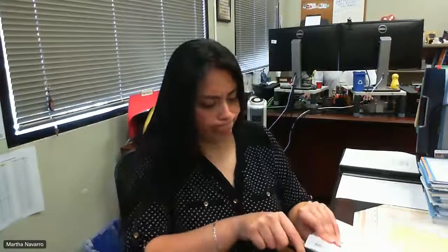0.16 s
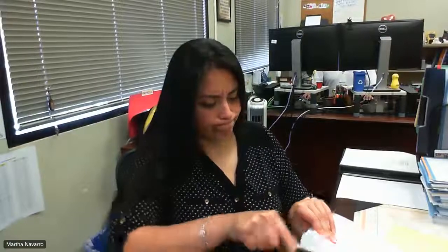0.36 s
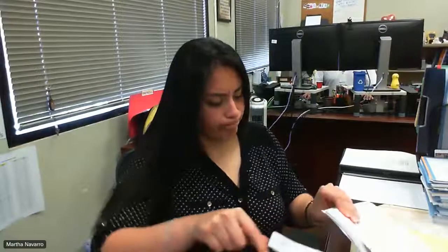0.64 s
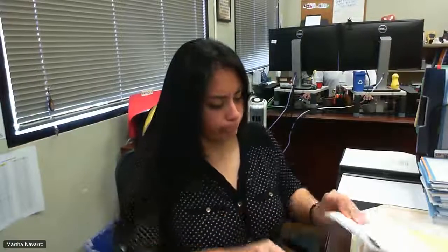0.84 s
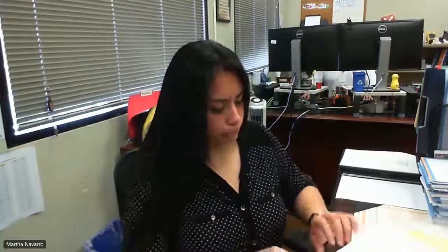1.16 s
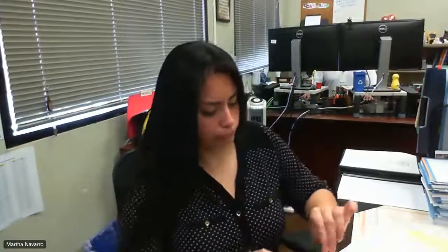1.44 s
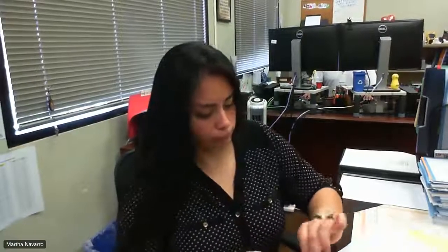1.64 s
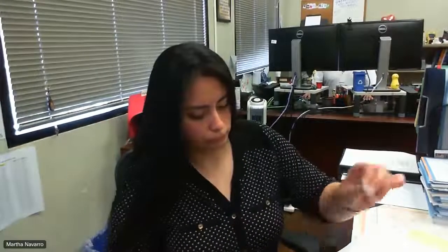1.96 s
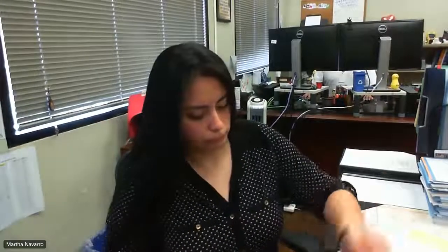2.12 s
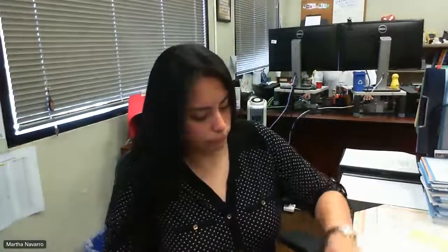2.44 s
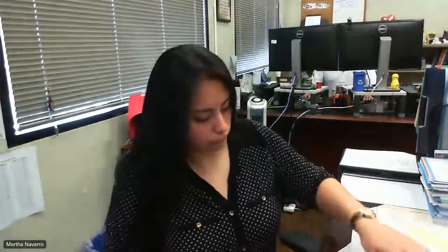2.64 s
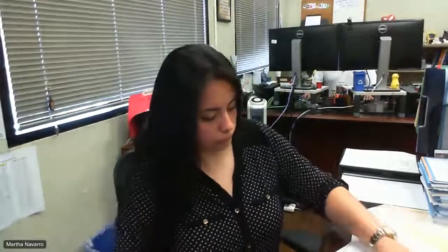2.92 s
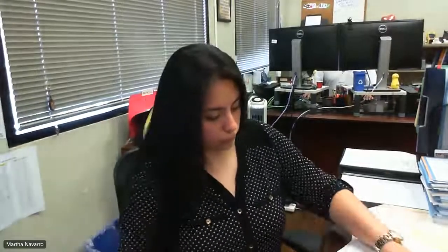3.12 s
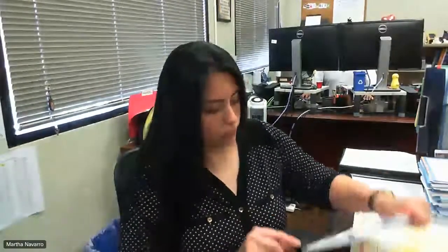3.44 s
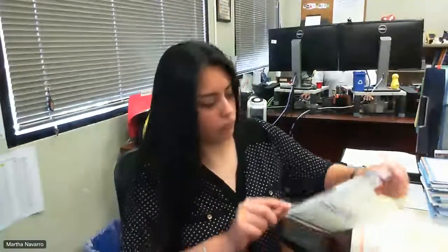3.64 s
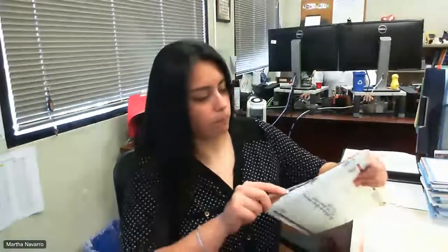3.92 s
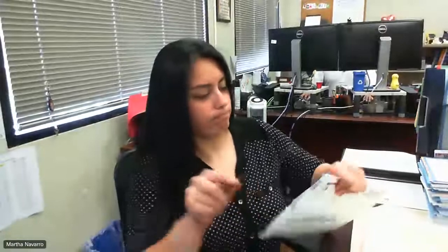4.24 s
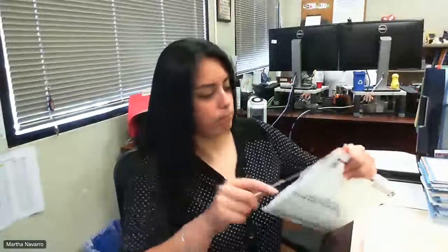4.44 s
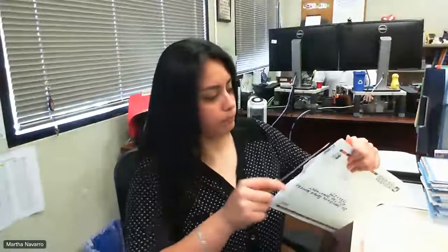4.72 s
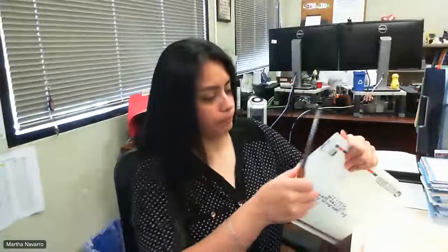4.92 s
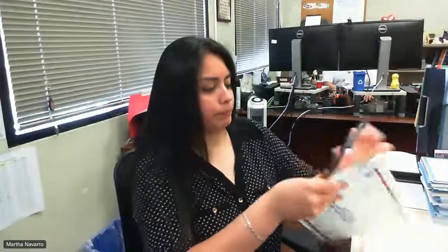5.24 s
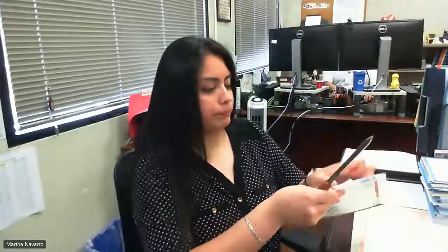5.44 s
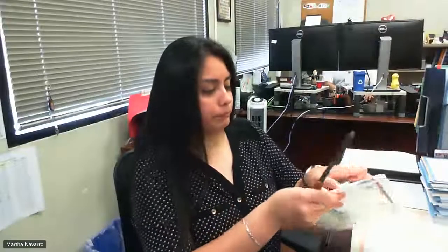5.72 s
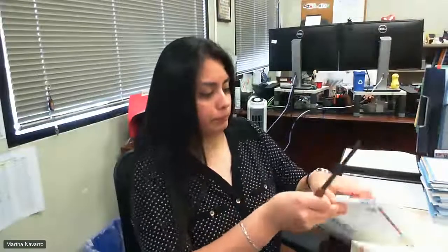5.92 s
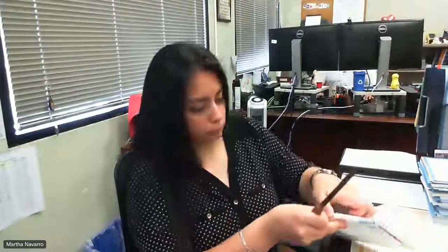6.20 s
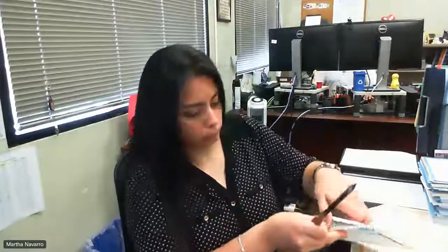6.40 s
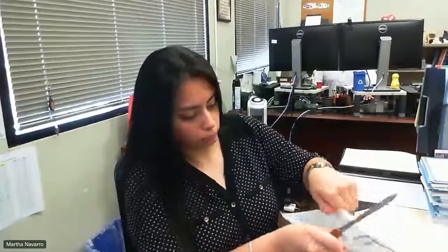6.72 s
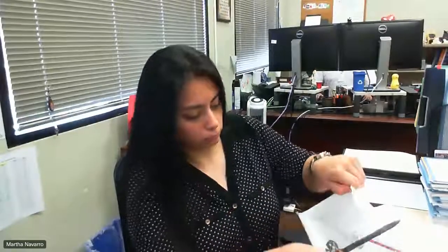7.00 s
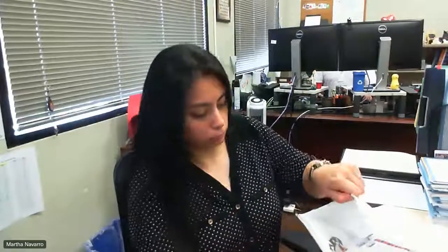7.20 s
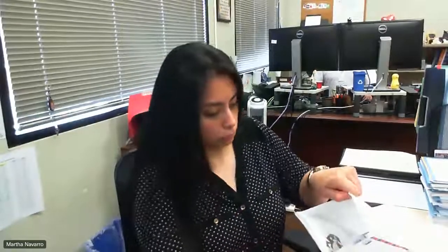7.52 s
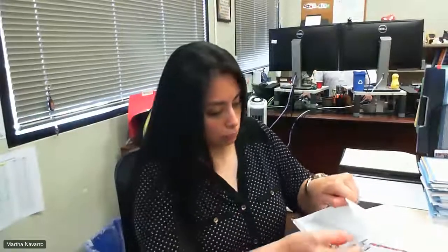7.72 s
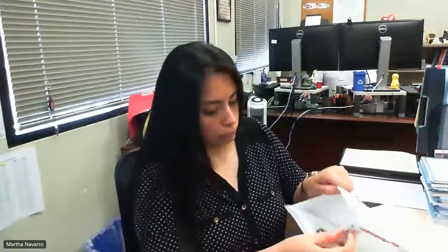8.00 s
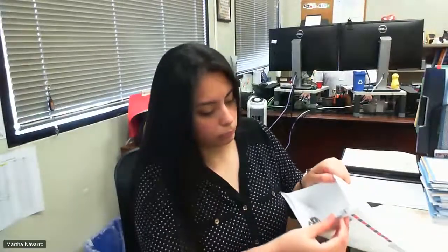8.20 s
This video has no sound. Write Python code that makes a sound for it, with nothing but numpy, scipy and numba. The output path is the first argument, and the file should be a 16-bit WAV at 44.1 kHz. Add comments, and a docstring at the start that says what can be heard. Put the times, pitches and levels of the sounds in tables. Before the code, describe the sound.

Close laptop microphone in a small, dry office. An envelope is slit with loud crackling rips in the first half second, then a firm knock on the desk. Quiet sliding and a short crisp burst follow near two seconds, then a softer thud. Another sharp rip comes past four seconds, then faint rustles, and finally hollow paper crumpling and snapping with small knocks.

```python
"""Paper envelopes are slit, put down, picked up and emptied on an office desk, near a laptop microphone.
Paper: random creases ring as damped sines, snaps click and rattle, a pocket of air resonates, a sheet flaps.
Folds whistle (noise in a narrow resonance), panels ping (sines), sheets slide (band noise).
Desk: knocks ring its low modes, leaning arms make it hum (wavering sines).
A small room answers with a noise tail; the air of the office is coloured noise."""
import sys
import numpy as np
from scipy import signal
from scipy.fft import rfft, irfft, next_fast_len
from scipy.io import wavfile
from scipy.ndimage import uniform_filter1d
from numba import njit

SR = 44100
rng = np.random.default_rng(int(sys.argv[2]) if len(sys.argv) > 2 else 0)


def to_wav(sig):
    """Store sig (one row per channel, or 1-D mono) as 16-bit WAV at the path in sys.argv[1].

    Samples outside -1..1 are clipped; the rate is SR.
    """
    pcm = np.clip(np.atleast_2d(sig), -1, 1) * 32767
    pcm = np.round(pcm).astype(np.int16)
    wavfile.write(sys.argv[1], SR, pcm.T)  # frames by channels


N = 368481


def undb(db):
    """Decibels to amplitude."""
    return 10 ** (np.asarray(db) / 20)


def unit(x):
    """Scale to rms 1."""
    return x / np.sqrt(np.mean(x ** 2))


def curves(table):
    """Columns of a table joined by straight lines over time, -120 outside it."""
    time_s, *columns = np.transpose(table)
    t = np.arange(N) / SR
    return [np.interp(t, time_s, column, left=-120, right=-120) for column in columns]


def colour(x, points):
    """Filter by (frequency [Hz], gain [dB]) points, straight over log frequency."""
    hz, db = np.transpose(points)
    size = next_fast_len(N)
    f = np.arange(size // 2 + 1) * SR / size + 1  # + 1 avoids log 0
    gain = undb(np.interp(np.log(f), np.log(hz), db))
    return irfft(rfft(x, size) * gain, size)[:N]


def band(x, lo_hz, hi_hz):
    """Butterworth band-pass."""
    return signal.sosfilt(signal.butter(2, [lo_hz, hi_hz], "bandpass", fs=SR, output="sos"), x)


def walk(rate_hz):
    """Random normal levels, a new one each 1 / rate_hz, joined by straight slews."""
    k = int(SR / rate_hz)
    levels = np.repeat(rng.standard_normal(N // k + 1), k)
    return uniform_filter1d(levels, k)[:N]


@njit
def rings(n, start, step, fade, size):
    """Damped sines: one for each start sample, angular step, fade per sample and size."""
    y = np.zeros(n)
    for k in range(len(start)):
        turn, z, i = fade[k] * np.exp(1j * step[k]), size[k] + 0j, start[k]
        for j in range(min(n - i, int(7 / (1 - fade[k])))):
            y[i + j] += z.imag
            z *= turn
    return y


@njit
def svf(x, hz, damp):
    """State-variable band-pass whose centre moves; gain 1 at the centre."""
    y, b, l = np.empty(len(x)), 0., 0.
    for i in range(len(x)):
        g = np.tan(np.pi * hz[i] / SR)
        v = (b + g * (x[i] - l)) / (1 + g * (g + damp))
        b, l, y[i] = 2 * v - b, l + 2 * g * v, damp * v
    return y


def lift(x, hz, damp, db):
    """A moving resonance stands out of a broad sound; rms 1."""
    return unit(x + undb(db) * svf(x, np.clip(hz, 300, 12000), damp))


def held(time_s, values):
    """Each value lasts from its moment to the next."""
    index = np.searchsorted(time_s, np.arange(N) / SR) - 1
    return values[np.clip(index, 0, None)]


def held_note(x, start_s, length_s, db, fade_db, edge_s):
    """The start of x, placed at start_s: opens, fades evenly in dB and closes; silence elsewhere."""
    t, out = np.arange(int(length_s * SR)) / SR, np.zeros(N)
    edges = np.clip(np.minimum(t, length_s - t) / edge_s, 0, 1)
    out[int(start_s * SR):][:len(t)] = x[:len(t)] * edges * undb(db - fade_db * t / length_s)
    return out


# spectrum of the office air: (frequency [Hz], relative density [dB])
AIR_SPECTRUM = [(15, -41.5), (25, -9), (205, -22), (364, -8.5), (566, -12.5), (754, -18.5), (881, -17.5),
                (2370, -21), (3070, -30.5), (3980, -31.5), (5440, -33), (6700, -26), (12500, -17)]
AIR_DB = -72


def air():
    """Ventilation and microphone hiss: coloured noise, wavering a little."""
    level_db = AIR_DB + 1.5 * walk(3.9) + 1.0 * walk(7.7)
    return unit(colour(rng.standard_normal(N), AIR_SPECTRUM)) * undb(level_db)


ROOM_T60_S, ROOM_DB, ROOM_GAP_S = 0.055, -9, 0.0023


def room(x):
    """Diffuse tail of a small furnished office: x plus its convolution with decaying noise."""
    t = np.arange(SR // 2) / SR
    tail = rng.standard_normal(len(t)) * undb(-60 * t / ROOM_T60_S) * (t > ROOM_GAP_S)
    tail /= np.sqrt(np.sum(tail ** 2))
    return x + undb(ROOM_DB) * signal.fftconvolve(x, tail)[:N]


# low hums of the desk under leaning arms:
# (start [s], length [s], frequency [Hz], level [dB], fade over the length [dB])
DESK_HUMS = [(2.52, 0.17, 190, -65.5, 4.5), (2.75, 0.046, 187, -68.5, 3), (4.05, 0.3, 105, -73, -6),
             (4.299, 0.61, 104.2, -58, 19.5), (4.46, 0.073, 179, -65, 2), (4.92, 0.47, 105, -77, 0),
             (5.149, .18, 182, -64, 4), (6.58, 0.17, 186, -69, 0.5), (6.95, 0.43, 167.4, -67.5, 8)]


def desk_hums():
    """Sines of the desk, wavering in pitch and level."""
    out = np.zeros(N)
    for start_s, length_s, hz, db, fade_db in DESK_HUMS:
        turns = np.cumsum(hz * (1 + .045 * walk(90)[:SR])) / SR
        hum = np.sqrt(2) * np.sin(2 * np.pi * turns) * undb(3.5 * walk(60)[:SR])
        out += held_note(hum, start_s, length_s, db, fade_db, edge_s=0.01)
    return out


# hands and paper stacks landing on the desk: (time [s], level [dB], pitch that the blow favours [Hz])
KNOCKS = [(0.51, -37.5, 386), (1.145, -15, 860), (2.466, -25.5, 220), (3.262, -51.5, 874),
          (4.288, -31.5, 195.8), (5.422, -53, 469), (5.534, -38.5, 362.5), (6.47, -39, 168),
          (6.9, -23, 470), (7.272, -34, 850), (7.746, -31, 430)]
# modes of the desk top: (frequency [Hz], level [dB], t60 [s])
DESK_MODES = [(102, -12, 0.12), (157, -8, 0.11), (191.6, -12.5, 0.09), (212, -7.5, 0.098),
              (312, -11, 0.047), (403, -6, 0.042), (475, -16, 0.048), (566, -14, 0.042), (624, -12, 0.086),
              (760, -9, 0.047), (860, -10, 0.086), (1250, -14.5, 0.026)]


def knocks():
    """Each knock is a short cluster of soft pushes that rings the modes of the desk top."""
    out = np.zeros(N)
    hz, mode_db, t60_s = np.transpose(DESK_MODES)
    for time_s, blow_db, blow_hz in KNOCKS:
        lag, sign = rng.random((len(hz), 2)).T
        start = ((time_s + 0.011 * lag) * SR).astype(np.int64)
        octaves_off = np.log2(hz / blow_hz)
        size = undb(blow_db + mode_db - 11.0 * octaves_off ** 2) * np.sign(sign - .5)
        out += rings(N, start, 2 * np.pi * hz / SR, 1000 ** (-1 / t60_s / SR), size)
    push = np.hanning(int(0.0011 * SR))  # a hand is soft
    return np.convolve(band(out, 95., 4000.), push / push.sum())[:N]


# sheets sliding over each other:
# (start [s], length [s], frequency [Hz], level [dB], fade over the length [dB])
SLIDES = [(1.504, 0.46, 6300, -69.5, 2.5), (3.483, .11, 6600, -51.5, -7.5), (6.501, 0.43, 6940, -63, -1),
          (7.368, 0.39, 6340, -48, 21)]


def slides():
    """Smooth rubbing: noise in a broad band around the pitch of each slide."""
    out = np.zeros(N)
    for start_s, length_s, hz, db, fade_db in SLIDES:
        hiss = unit(band(rng.standard_normal(SR), hz * 0.8, hz * 1.07))
        out += held_note(hiss, start_s, length_s, db, fade_db, edge_s=0.016)
    return out


# small stiff panels ringing as a fold gives way: (time [s], frequency [Hz], level [dB])
PINGS = [(1.936, 3360, -29), (1.951, 3920, -33), (4.195, 3770, -32), (4.244, 4220, -22),
         (5.531, 1870, -40.5), (6.994, 1810, -30), (7.656, 2487, -21), (7.657, 3750, -32.5)]
PING_T60_S, PING_SWELL = 0.02, 3.3  # the swell is that many times quicker than the decay


def pings():
    """A sine that swells in and dies: a slow decay minus a quicker one."""
    time_s, hz, db = np.transpose(PINGS)
    start, step = (time_s * SR).astype(np.int64), 2 * np.pi * hz / SR
    fade = np.full(len(time_s), 1000 ** (-1 / PING_T60_S / SR))
    slow = rings(N, start, step, fade, undb(db))
    quick = rings(N, start, step, fade ** PING_SWELL, undb(db))
    return 2 * (slow - quick)


# folds that rub and whistle on one narrow pitch: (start [s], length [s], frequency [Hz], level [dB])
WHISTLES = [(0.11, 0.053, 5500, -54), (.02, 0.07, 1170, -56), (0.34, 0.25, 1400, -44),
            (4.3, 0.094, 1200, -47), (0.558, 0.17, 1125, -34), (1.604, 0.12, 880, -68),
            (1.946, 0.055, 1280, -36), (2.064, 0.078, 3600, -64.5), (2.095, 0.17, 3100, -66),
            (2.11, 0.13, 2370, -62.5), (2.05, 0.25, 5070, -67), (2.11, 0.13, 850, -65),
            (2.707, 0.074, 1300, -66), (3.264, 0.05, 920, -51), (3.258, 0.093, 1277, -52),
            (4.098, 0.042, 1250, -57), (3.491, 0.12, 4000, -46.5), (4.926, 0.052, 5900, -61),
            (5.418, 0.054, 380, -60), (4.9, 0.056, 1590, -53), (5.46, 0.056, 1470, -61.5),
            (5.458, 0.031, 3110, -58.5), (5.677, 0.084, 4470, -52.5), (5.673, 0.096, 1300, -60.5),
            (6.197, 0.023, 5900, -54.5), (7.95, 0.12, 1600, -56), (8.064, 0.18, 1770, -65.5),
            (8.19, 0.12, 1760, -59)]


def whistles():
    """Rubbing noise in a narrow resonance that wanders in pitch; it opens, fades evenly, closes."""
    out, uneven, wander = np.zeros(N), undb(2.0 * walk(70)), 1 + .015 * walk(20)
    for start_s, length_s, hz, db in WHISTLES:
        noise = rng.standard_normal(SR // 2)
        first = int(start_s * SR)
        near = slice(first, first + int(length_s * SR))
        rub = noise[:len(out[near])] * uneven[near]
        tone = svf(rub, hz * wander[near], 40. / hz + .022)
        # the rubbing keeps it going: level partly evened out
        tone = tone / uniform_filter1d(np.abs(tone) + 1e-9, SR // 100) ** .6
        out += held_note(unit(tone), start_s, length_s, db, fade_db=16, edge_s=0.011)
    return out


# rustles, one for each move of the hands:
# (top reached [s], hold [s], rise [s per 20 dB], fall [s per 20 dB], crisp crackle level [dB],
#  duller part re crisp [dB], pocket re crisp [dB], flap re crisp [dB], pocket pitch [Hz])
RUSTLES = [(.122, 0.016, 0.033, 0, -42.5, -5, -9.5, -13, 1508),
           (0.141, .02, .02, 0.061, -33, -0.5, -13, -13, 1940),
           (.275, .003, .02, 0.17, -47.5, -19, -10.5, -23, 1200),
           (.37, .02, 0.12, 0.09, -46.5, -10, -2.8, -8, 1440),
           (.42, .003, 0.086, 0.083, -34.5, -6, -6, -14.5, 1340),
           (0.511, 0.0034, 0.028, 0.062, -17, -1.5, -5, -14.5, 1400),
           (.6, .05, 0.053, 0.093, -40, -7.5, -16, -41, 1135),
           (1.161, 0.00303, 0.042, 0.04, -46, 1, -1.5, 4.5, 903),
           (1.21, .003, 0.047, 0.071, -71, -3.5, 11.5, 22.5, 900),
           (1.51, .003, 0.09, 0.13, -59.5, -4, 3, -8.5, 1294),
           (1.79, .05, 0.25, 0.11, -66, 7, 0, -16, 1245),
           (1.93, 0.022, 0.036, 0.077, -34.5, -2, -14.5, -22, 1388),
           (2.47, .003, 0.059, 0.044, -56.5, -21, -15.5, 2.5, 945),
           (2.71, .01, .03, .12, -71.5, -2, 1.5, -3, 1300),
           (3.27, .02, .012, .08, -71, -2.5, 6.5, 6.5, 1200),
           (3.486, 0.11, 0.006, 0.06, -45.5, -7, -17.5, -21.5, 1500),
           (3.77, .003, 0.17, 0.35, -72.5, 2, 2.5, -8.5, 1477),
           (4.07, 0.014, 0.0048, 0.044, -47.5, -2.5, -9, -30, 1299),
           (4.1, .06, .03, 0.32, -61.5, 1, -1, -10.5, 1286),
           (4.239, 0.017, 0.021, .05, -26, 5, -0.5, -28.5, 1248),
           (4.3, 0.0024, .04, 0.06, -29, -0.5, -9.5, -17, 1323),
           (4.369, 0.0024, 0.0662, 0.092, -37, -6, -13.5, -22, 1290),
           (4.47, .05, 0.09, 0.05, -51, -11.5, -16.5, -19, 1266),
           (4.926, .01, 0.008, 0.017, -59.5, 0, -7, -9, 1260),
           (5.03, .003, 0.1, 0.061, -71, 0.5, -2.5, -5, 922),
           (5.26, .003, .13, 0.22, -54.5, -0.5, -11.5, -17.5, 1634),
           (5.541, .003, 0.045, 0.077, -50.5, 4, -4, -7.5, 1500),
           (5.702, .003, 0.069, 0.27, -60.5, -7, -6.5, -8, 1334),
           (5.89, .003, 0.17, 0.061, -57, -15.5, -17, -16.5, 1173),
           (6.19, 0.0027, 0.06, 0.059, -67.5, -4, -13.5, -11, 1150),
           (6.35, .003, 0.038, 0.035, -52, 8, -0.5, -16.5, 1578),
           (6.469, .012, .022, 0.071, -40.5, 1.5, -4, -17.5, 1650),
           (6.53, .06, 0.07, 0.57, -54, -6, -10.5, -14.5, 1436),
           (6.889, 0.14, 0.047, 0.072, -38.5, -4, -2.5, -7.5, 1400),
           (7.24, .003, 0.16, 0.037, -50, 1.5, -1.5, -12.5, 1418),
           (7.29, 0.0087, .015, 0.058, -62.5, -7, 14.5, 4, 1202),
           (7.38, 0.026, .03, 0.094, -48.5, -1, -21, -19, 1265),
           (7.68, .062, .02, 0.02, -52.5, 0, 12.5, -2, 1000),
           (7.75, .003, 0.0092, 0.084, -37.5, 13.5, 5.5, 9, 1130),
           (7.86, .03, .05, 0.088, -58.5, 5, 6.5, 1, 1410)]
# faint stir between the rustles:
# (time [s], crackle level [dB], pocket level [dB], flap level [dB], pocket pitch [Hz])
STIR = [(0, -63, -57.5, -58.5, 1140), (.3, -57, -59, -59, 1198), (.79, -69.5, -68.5, -72.5, 1293),
        (1.1, -69, -71.5, -76, 1013), (1.25, -76.5, -71, -71, 1000), (1.45, -80.5, -69, -65.5, 1290),
        (1.6, -74.5, -59.5, -67, 1293), (1.9, -77.5, -69, -62.5, 1415), (2.15, -75, -70.5, -73.5, 1301),
        (2.55, -79.5, -72, -71.5, 1097), (3.07, -83, -86, -81.5, 1239), (3.35, -75, -70, -71.5, 1190),
        (4.05, -74, -77.5, -76.5, 1370), (5.0, -81.5, -76.5, -74.5, 1163), (6.3, -81, -79, -75.5, 1301),
        (7.3, -62, -58, -73.5, 1243), (7.65, -63.5, -56, -61, 1291), (7.96, -76, -58, -65, 1468),
        (8.05, -73.5, -67.5, -74.5, 1485), (8.36, -71.5, -68.5, -73.5, 1739)]


def handling():
    """Rustles rise, hold and fall over the stir; powers add and weight the pitch of the pocket."""
    t = np.arange(N) / SR
    crisp_db, pocket_db, flap_db, stir_hz = curves(STIR)
    power = undb(2 * np.array([crisp_db, crisp_db, pocket_db, flap_db]))
    pitch = stir_hz * power[2]
    for top_s, hold_s, rise_s, fall_s, db, *parts_db, pocket_hz in RUSTLES:
        first = max(int((top_s - 3 * rise_s) * SR), 0)
        near = slice(first, int((top_s + hold_s + 3 * fall_s) * SR))
        before, after = (top_s - t[near]) / rise_s, (t[near] - top_s - hold_s) / fall_s
        under_db = 20 * np.maximum(0, np.maximum(before, after))
        own = undb(2 * (db - under_db + np.array([0, *parts_db])[:, None]))
        power[:, near] += own
        pitch[near] += pocket_hz * own[2]
    return (*10 * np.log10(power), pitch / power[2])


def tension(time_s, depth_db, lead_s):
    """The sheet is pulled taut and falls quieter just before each snap (dB)."""
    t = np.arange(N) / SR
    wait_s = np.append(time_s, 99)[np.searchsorted(time_s, t)] - t
    return -depth_db * np.exp(-wait_s / lead_s)


def zone(lo_hz, hi_hz, creases_per_s, cycles, spread_db, rub_db):
    """Creases pop at random, each on its own pitch, a few far larger; rubbing fills the gaps."""
    chance = rng.random((int(8000 * N / SR), 3))
    when, pitch, big = chance[:int(creases_per_s * N / SR)].T
    hz = lo_hz * (hi_hz / lo_hz) ** pitch
    size = undb(spread_db * np.minimum(-np.log(1 - big), 4.5)) * np.sqrt(hz)
    fade = np.exp(-np.pi * hz / cycles / SR)
    pops = rings(N, (when * N).astype(np.int64), 2 * np.pi * hz / SR, fade, size)
    rub = rng.standard_normal(N) * undb(2.0 * walk(40))
    return unit(band(pops, lo_hz, hi_hz)) + undb(rub_db) * unit(band(rub, lo_hz, hi_hz))


# sharp snaps of fibres and folds:
# (time [s], level [dB], pocket re level [dB], flap re level [dB], pitch [Hz], t60 [s])
SNAPS = [(0.122, -22, -18, -35, 6035, 0.063), (0.1427, -2.5, -14.5, -41, 8315, 0.045),
         (0.2584, -19.5, -42, -45, 6833, 0.12), (0.355, -19.5, -22, -28.5, 6980, 0.043),
         (0.4129, -10.5, -20, -36, 4957, 0.04), (0.4287, -25, -18, -30.5, 6930, 0.052),
         (0.5051, 1.5, -34, -24, 6026, 0.045), (0.5202, -5.5, -4, 4.5, 8130, 0.037),
         (0.533, -5.5, -8.5, -19, 6907, 0.18), (0.5647, 2, -2, -32, 5236, 0.012),
         (0.644, -26.5, -32, -42, 6570, 0.28), (1.145, -28, 11, -6, 6340, 0.066),
         (1.1522, -28.5, 8, 13, 5710, 0.073), (1.501, -33.5, -18, -35, 6150, 0.034),
         (1.8298, -29.5, -31, -37, 6806, 0.11), (1.868, -35, -26, -26, 5954, 0.033),
         (1.8946, -24.5, -42, -43, 6456, 0.027), (1.9094, -13.5, -35, -41, 5984, 0.021),
         (1.9178, -7, -36, -49, 6407, 0.03), (1.926, -18, -30, -40, 6400, 0.019),
         (1.9347, -12.5, -31, -38, 6680, 0.14), (1.9498, -8, -20, -39, 6610, 0.012),
         (1.9597, -11.5, -18, -44, 6580, 0.03), (2.4409, -39, -17, -3, 5567, 0.1),
         (2.453, -34.5, -23, 1.5, 9200, 0.15), (3.2652, -56, 10, 2.5, 6060, 0.035),
         (3.5997, -41, 4.5, 0, 6033, 0.11), (3.9561, -44.5, -10, -31.5, 6040, 0.18),
         (4.066, -19.5, -22.5, -49, 3407, 0.029), (4.1918, -17.5, -25, -41, 6482, 0.064),
         (4.224, -16.5, -1, -27, 4158, 0.16), (4.231, -21.5, 6.5, -32, 6230, 0.067),
         (4.2447, -1.5, -7, -24, 8310, 0.058), (4.254, -3, -27, -37, 6190, 0.065),
         (4.2877, -5.5, -33, -27, 6100, 0.025), (4.294, -14.5, -37, -29, 8320, 0.063),
         (4.9231, -42.5, -16, -22.5, 6470, 0.049), (5.0991, -49, 2, -15.5, 3123, 0.06),
         (5.248, -35, -19, -26, 7210, 0.049), (5.3542, -42, -28, -13, 6440, 0.21),
         (5.421, -49, 7.5, -14, 3072, 0.056), (5.5316, -15.5, -19, -32.5, 4057, 0.017),
         (5.744, -34, -9, -5.5, 6140, 0.052), (5.877, -36.5, -23.5, -21, 7005, 0.055),
         (6.0207, -50.5, -15.5, -12, 6598, 0.062), (6.1897, -41, -26, -27, 5347, 0.082),
         (6.3333, -41, -2, -31.5, 5656, 0.079), (6.3738, -34, -3.5, -22, 2880, 0.19),
         (6.4529, -21, -28, -29, 7190, 0.08), (6.6373, -36, -26, -34, 6310, 0.19),
         (6.8687, -19, -5, -28, 6440, 0.063), (6.8869, -24.5, 0.5, -6, 6390, 0.2),
         (7.0324, -21.5, 5.5, -12, 6900, 0.056), (7.2762, -36.5, 20.5, -6, 6080, 0.035),
         (7.367, -25, -14, -16, 6084, 0.21), (7.6567, -20.5, 11, 12.5, 3706, 0.14),
         (7.674, -12, -7, -4, 8670, 0.012), (7.6912, -31.5, 10, 24, 6097, 0.11),
         (7.7135, -38, 7, 16, 6630, 0.091), (7.7438, -13, 8.5, 4, 6640, 0.045),
         (7.7789, -24.5, 4, 4, 6330, 0.17), (7.8016, -27, 8.5, 4.5, 3788, 0.11),
         (7.8286, -40.5, 16, 29, 3552, 0.05), (7.8953, -31, 1.5, 1.5, 3842, 0.18)]
RATTLE_DB = -15.0  # rattle re click


def bursts(level_db, rise_s, crack_db):
    """Snap envelope: quick rise, crack of a few ms, then a rattle that dies at its own rate."""
    env = np.zeros(N)
    for (time_s, *_, t60_s), db in zip(SNAPS, level_db):
        first = int(time_s * SR)
        t = np.arange(N - first)[:SR // 4] / SR
        fall = undb(-60 * t / max(t60_s, .003)) + undb(crack_db) * np.exp(-t / 0.0015)
        env[first:][:len(t)] += undb(db) * fall * (1 - np.exp(-t / rise_s)) ** 2
    return env


def snap_clicks():
    """One impulse per snap, in a treble band and in the band of the pocket."""
    time_s, level_db, pocket_db, *_ = np.transpose(SNAPS)
    clicks = np.zeros(N)
    clicks[((time_s + .0018) * SR).astype(int)] = undb(level_db)
    treble = undb(3.5) * band(clicks, 2800., 9200.0)
    clicks[clicks > 0] *= undb(pocket_db)
    return treble + undb(11.5) * band(clicks, 700.0, 1800.0)


# crisp zone: (low [Hz], high [Hz], creases [1/s], cycles per crease, size spread [dB], rubbing [dB])
CRISP = (2410, 12000, 2100, 2.3, 2, 0.9)
# treble colour of the microphone port: (frequency [Hz], gain [dB])
MIC_PORT = [(1350, -34.5), (2300, -6), (3280, -6.5), (3860, -6.5), (4170, -6), (4870, -5.5), (6750, -0.5),
            (7670, -7.5), (8350, -3.5), (9090, -5.5), (11500, -8.5), (12100, -14), (12500, -23)]
DULL_HZ = 4430  # top of the duller part of the crackle


def crackle(crisp_db, dull_db):
    """Crisp creases and the rattle of the snaps, in ragged clumps."""
    time_s, level_db, _, _, fold_hz, _ = np.transpose(SNAPS)
    # one small panel after another lends its colour for some hundredths of a second
    gap, panel = rng.random((1000, 2)).T
    panel_hz = held(np.cumsum(.04 * gap), 2800 * 3.5 ** panel)
    crisp = lift(colour(zone(*CRISP), MIC_PORT), panel_hz, 0.049, 3.0)
    rattle = lift(colour(rng.standard_normal(N), MIC_PORT), held(time_s, fold_hz), 0.076, 11)
    dull = signal.sosfiltfilt(signal.butter(2, DULL_HZ, fs=SR, output="sos"), crisp)
    out = (crisp - dull) * undb(crisp_db) + dull * undb(dull_db)
    out += rattle * bursts(level_db + RATTLE_DB, 0.0013, 3.1)
    return out * undb(2.9 * walk(300) - 1.0)  # fibres give way in clumps


# pocket zone: (low [Hz], high [Hz], creases [1/s], cycles per crease, size spread [dB], rubbing [dB])
POCKET = (777, 2890, 800, 10, 4.4, 1.1)


def pocket(pocket_db, pocket_hz):
    """Air between the two faces of the envelope rings at a pitch set by how wide it gapes."""
    _, level_db, snap_db, *_ = np.transpose(SNAPS)
    creases = band(zone(*POCKET), *POCKET[:2])
    hollow = lift(creases, pocket_hz, 0.32, 7.4) * undb(0.83 * walk(110))
    return hollow * (undb(pocket_db) + bursts(level_db + RATTLE_DB + snap_db, 0.0052, 2.8))


# flap zone: (low [Hz], high [Hz], creases [1/s], cycles per crease, size spread [dB], rubbing [dB])
FLAP = (251, 820, 270, 2.8, 1.8, 4.4)


def flap(flap_db):
    """The whole sheet flaps; it also pushes air and shakes the desk top under the microphone."""
    _, level_db, _, snap_db, *_ = np.transpose(SNAPS)
    sheet = unit(zone(*FLAP)) * (undb(flap_db) + bursts(level_db + RATTLE_DB + snap_db, 0.0062, -5.5))
    thump = unit(band(rng.standard_normal(N), 45.0, 220.0)) * undb(0.69 * flap_db - 27)
    return sheet + thump


def paper():
    """Three zones of the sheet, each driven by the handling and by the snaps."""
    *handling_db, pocket_hz = handling()
    snap_s = np.sort(np.transpose(SNAPS)[0])
    crisp_db, dull_db, pocket_db, flap_db = handling_db + tension(snap_s, depth_db=3.5, lead_s=0.018)
    return crackle(crisp_db, dull_db) + snap_clicks() + pocket(pocket_db, pocket_hz) + flap(flap_db)


def scene():
    """Paper and desk in the room, over the air."""
    desk = desk_hums() + knocks()
    return (room(desk + slides() + pings() + whistles() + paper()) + air())[None]


# brief dips of the level: start [s]
DIPS = [0.918, 1.598, 2.896, 3.32, 4, 6.78, 7.418, 7.638, 8.319]
DIP_DB, DIP_FALL_S, DIP_HOLD_S, DIP_BACK_S = -19, 0.0034, 0.0033, 0.0049


def dips():
    """Gain that drops, stays down and climbs back within about a hundredth of a second."""
    corners_s = np.add.outer(DIPS, np.cumsum([0, DIP_FALL_S, DIP_HOLD_S, DIP_BACK_S]))
    corners_db = np.tile([0, DIP_DB, DIP_DB, 0], len(DIPS))
    return undb(np.interp(np.arange(N) / SR, corners_s.ravel(), corners_db))


TOP_HZ = 12150


def record(dry):
    """The small microphone loses deep bass; the level dips; the call software cuts the top steeply."""
    thin = signal.sosfilt(signal.butter(1, 45., "highpass", fs=SR, output="sos"), dry) * dips()
    return signal.sosfilt(signal.ellip(10, .3, 80, TOP_HZ, fs=SR, output="sos"), thin)


dry = scene()
out = record(dry)
to_wav(out)
```